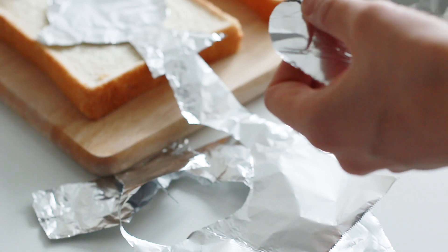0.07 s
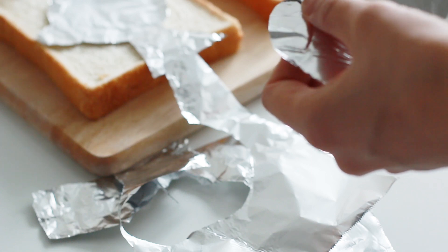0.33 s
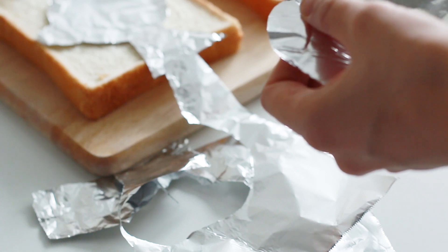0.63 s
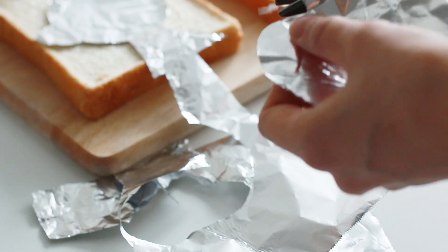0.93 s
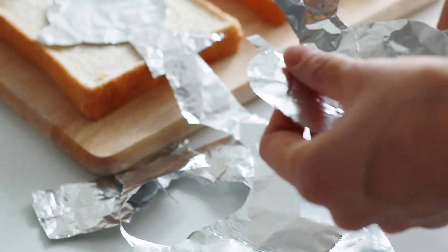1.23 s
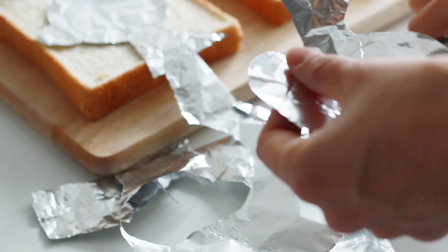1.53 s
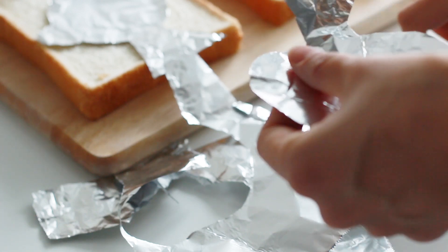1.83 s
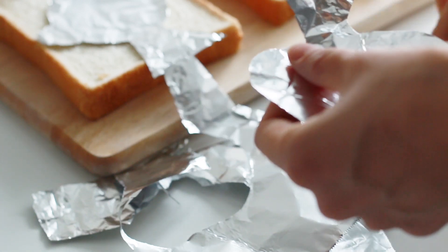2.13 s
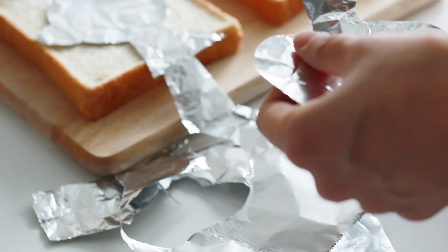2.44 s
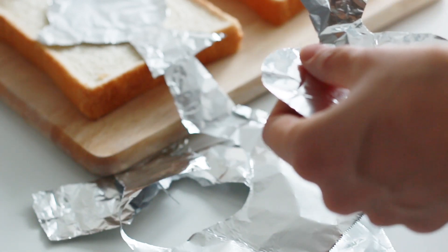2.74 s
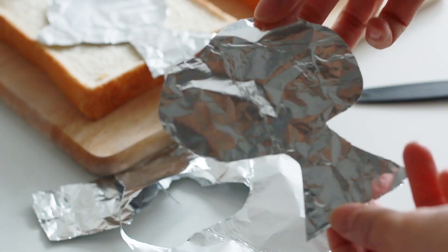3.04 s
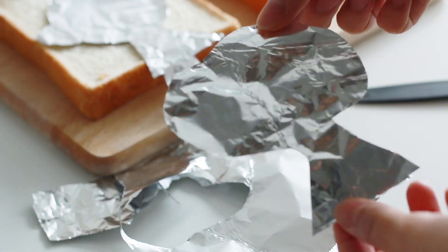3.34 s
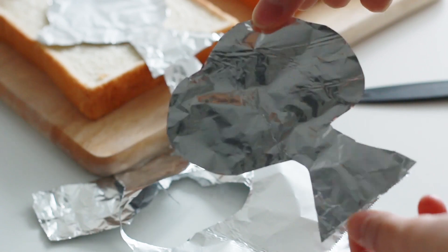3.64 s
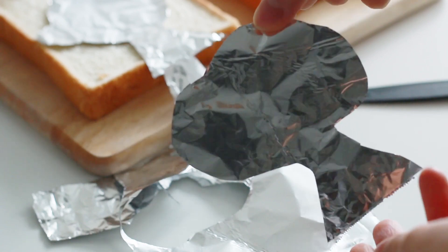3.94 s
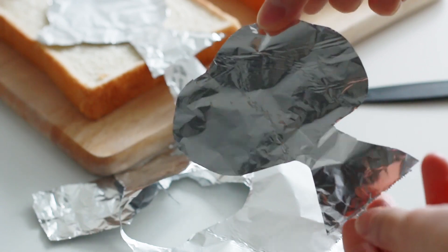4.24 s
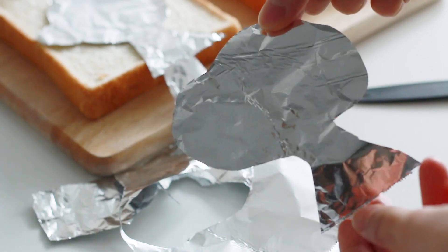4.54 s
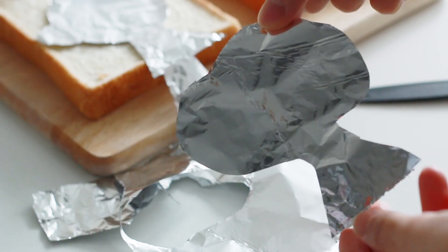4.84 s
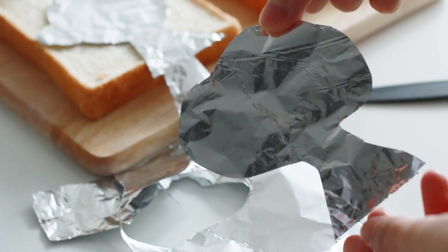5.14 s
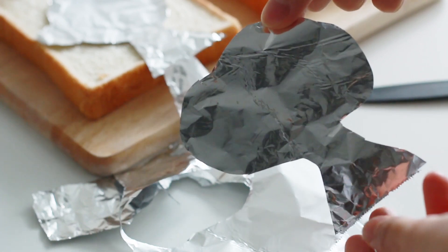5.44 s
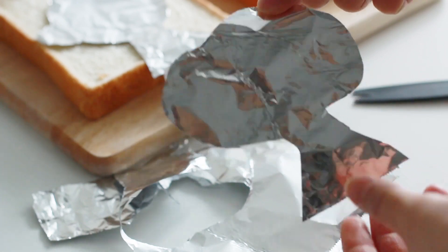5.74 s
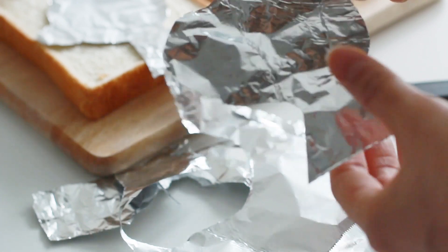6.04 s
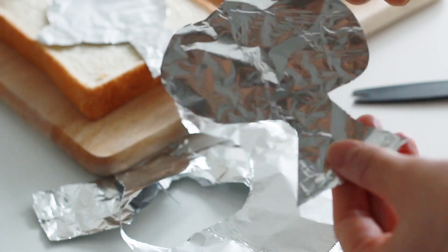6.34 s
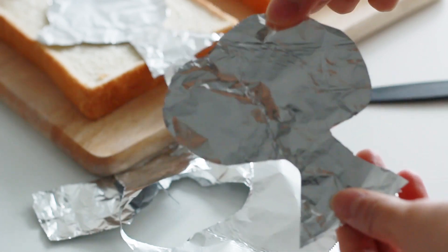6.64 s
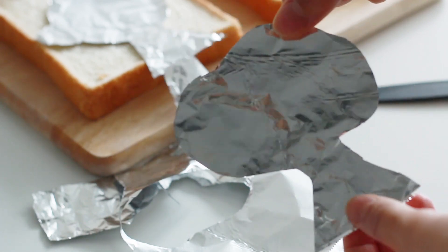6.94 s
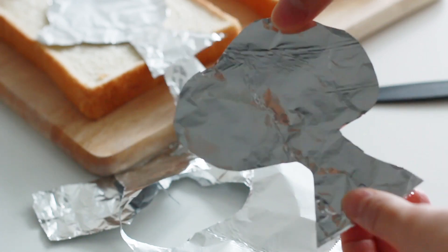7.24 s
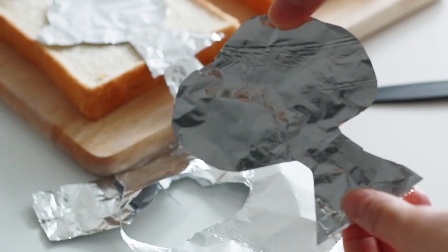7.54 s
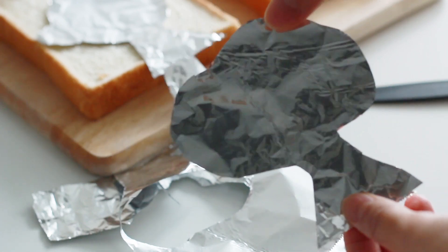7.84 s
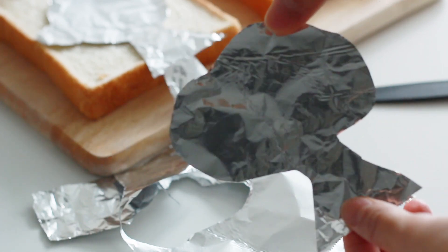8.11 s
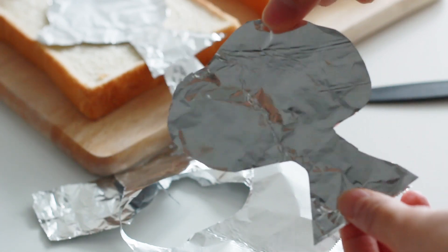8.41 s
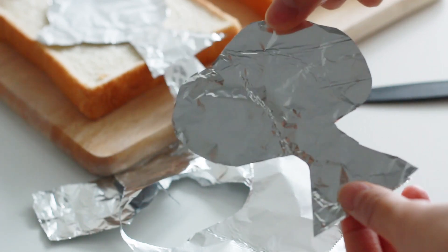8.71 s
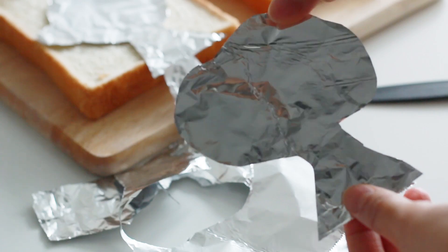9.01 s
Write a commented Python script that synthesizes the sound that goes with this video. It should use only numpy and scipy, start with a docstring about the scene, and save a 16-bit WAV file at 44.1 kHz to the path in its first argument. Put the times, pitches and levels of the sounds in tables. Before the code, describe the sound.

Hands lift and bend a piece of aluminium foil, making scattered sharp crinkles and ticks over a faint low hum.

```python
"""A cut-out of thin aluminium foil is lifted and laid on a kitchen table, near a small stereo microphone.
Single creases snap through, swarms of tiny buckles rustle as the sheet bends, and a sliding edge excites
its resonances. The room reverberates briefly. Beneath lie a faint hiss and a low rumble that step up after
three seconds, and a far bird, perhaps a crow, gives three hoarse harmonic calls."""
import sys
import numpy as np
from scipy import signal
from scipy.fft import rfft, irfft, next_fast_len
from scipy.io import wavfile
from scipy.ndimage import uniform_filter1d

SR = 44100
rng = np.random.default_rng(int(sys.argv[2]) if len(sys.argv) > 2 else 0)


def log_audio(samples):
    """Write samples as a 16-bit WAV file to the path given in sys.argv[1]."""
    # one column per channel
    frames = np.atleast_2d(samples).T
    # limit to full scale, then quantise
    limited = np.clip(frames, -1, 1)
    pcm = np.round(limited * 32767).astype(np.int16)
    wavfile.write(sys.argv[1], SR, pcm)


N = 399987

# Bends of the sheet. Each row: start in seconds, length in seconds, level in dB, body (bass lift) in dB.
BENDS = [(0, 0.027, -48.5, -7), (0.05, 0.059, -55.5, 0), (0.112, 0.025, -57, 1), (0.198, 0.03, -64.5, 9.5),
         (0.444, 0.024, -69.5, 13), (0.469, 0.025, -53.5, 1.5), (0.571, 0.022, -41, -6.5),
         (0.893, 0.06, -76.5, 3), (1.221, 0.054, -47.5, 3.5), (1.279, 0.052, -48.5, -12),
         (1.534, 0.036, -50, -10.5), (1.557, 0.049, -43.5, -11), (1.922, 0.03, -70, 7),
         (1.956, 0.057, -40.5, -15), (2.019, 0.089, -58, -16), (3.037, 0.085, -50, 7),
         (3.316, 0.083, -45.5, 4), (3.522, 0.03, -46.5, -1.5), (3.643, 0.062, -50.5, -4),
         (4.303, 0.049, -55, 2), (4.34, 0.035, -46.5, -13), (4.377, 0.061, -44.5, -3.5),
         (4.753, 0.04, -45.5, -3), (4.851, 0.032, -44, -5), (4.881, 0.05, -64.5, 5),
         (5.813, 0.022, -61, 10), (6.079, 0.033, -58, -2), (6.098, 0.08, -39, -5), (6.25, 0.067, -49, -1),
         (6.283, 0.031, -32, 2), (6.323, 0.049, -39, 4.5), (6.403, 0.25, -56.5, 9.5),
         (6.472, 0.1, -49.5, 25), (6.523, 0.055, -42, 12), (6.589, 0.27, -54, 11.5),
         (6.842, 0.091, -52.5, 25), (6.915, 0.074, -41.5, 13.5), (6.96, 0.08, -42, 8.5),
         (7.035, 0.053, -44.5, 4), (7.302, 0.032, -52.5, 17), (7.33, 0.043, -37, 5)]
# Creases that snap. Each row: time in seconds, level in dB, body in dB (more for a larger facet).
CREASES = [(0.0294, -49, -9), (0.0445, -37.5, -1), (0.066, -53.5, -13), (0.54, -66, -3), (0.5814, -40.5, 3),
           (1.0939, -45, -8.5), (1.2135, -49.5, 1), (1.2514, -35.5, -0.5), (1.2868, -40.5, -0.5),
           (1.396, -45.5, -10), (1.442, -57.5, 5), (1.675, -56.5, -12), (2.3697, -62.5, 12),
           (2.4357, -43, -1.5), (2.714, -59.5, -2), (2.837, -53.5, -15), (3.066, -41.5, -4),
           (3.099, -47.5, -8), (3.209, -57, 5), (3.2471, -56.5, 5.5), (3.4116, -31.5, -24),
           (3.517, -49, -1.5), (4.343, -42, -8), (6.096, -39.5, -26), (6.291, -34.5, -15),
           (6.3361, -33, -26), (6.374, -29.5, -2), (6.6475, -43, -21), (6.6612, -43.5, 4),
           (6.6811, -40.5, -7), (6.7277, -42.5, -0.5), (6.7706, -50, 1), (6.8515, -42, -12),
           (6.887, -35, -4), (6.922, -39, -5), (7.04, -39.5, -19), (7.0756, -42, -4), (7.3302, -38.5, 2),
           (7.364, -39, 4.5), (7.4612, -48, 10), (7.744, -41, -8), (7.7805, -31.5, -12), (7.972, -50, -2),
           (8.191, -69, 11), (8.4546, -62, 6), (8.5565, -61.5, 11), (8.583, -48, 1.5), (8.6566, -38, -4.5),
           (8.847, -60.5, 23), (8.8954, -43.5, -35), (8.9224, -35.5, -23), (8.974, -44, -8),
           (9.008, -49.5, -7), (9.047, -44.5, -24)]
# Slips of an edge. Each row: start in seconds, length in seconds, level in dB.
EDGE_SLIPS = [(3.692, 0.039, -53), (3.732, 0.053, -53.5), (4.623, 0.072, -50.5), (4.706, 0.041, -57.5),
              (5.069, 0.053, -65), (5.176, 0.14, -68.5)]
# Resonances of the sliding sheet. Each row: frequency in Hz, width in Hz, peak level in dB.
RESONANCES = [(2470, 300, -6.5), (4600, 350, -0.5), (5530, 300, -10), (8070, 410, -1), (9240, 460, -1.5),
              (10530, 420, 2), (10780, 330, 1.5), (12000, 320, 4.5), (14300, 1200, -2.5)]
# Anchors of the spectral tilt, in Hz: body, middle, pivot, top.
TILT_HZ = [1500, 4200, 9000, 13000]
# Calls of the bird. Each row: start in seconds, length in seconds, level in dB.
BIRD_CALLS = [(3.05, 0.19, -73.5), (3.7, 0.25, -65.5), (4.56, 0.268, -65.5)]

# Spectral shapes. Each row: frequency in Hz, relative spectral density in dB.
FOIL_SPECTRUM = [(200, -30), (450, -12), (750, -19), (1000, -6.5), (1700, -10), (2300, -12), (3050, -7.5),
                 (3500, -11), (4500, -3), (6300, -9.5), (8900, 0.5), (11200, -2.5), (12800, -6.5),
                 (15800, -13)]
HELD_COLOUR = [(380, -18), (600, 7.5), (900, 2), (1400, 0.5), (2300, 2), (3100, 2.5), (4500, 2), (9000, 1),
               (13000, -2)]  # added before STEP_S, while the foil is held low against the board
QUIET_SPECTRUM = [(15, 41), (35, 39.5), (70, 34.5), (115, 28), (200, 22), (290, 15), (600, 12), (1500, 3),
                  (4000, 1), (13000, 2), (16000, -10.5)]
BOOM_SPECTRUM = [(15, -19.5), (32, -7), (53, -15), (62, -1.5), (69, 2), (78, -2), (95, -7.5), (115, -22.5),
                 (160, -36), (300, -65.5)]
RUMBLE_SPECTRUM = [(70, -15.5), (105, -2), (125, 2), (165, 1), (195, -10), (240, -20.5), (290, -27.5),
                   (335, -23), (450, -31.5), (750, -35.5), (1500, -47.5), (4000, -70.5)]
HISS_SPECTRUM = [(300, 12), (1000, 6), (3000, 0), (8000, -5), (12000, -5.5), (16000, 0), (17000, -24)]
# Envelopes of the low noise. Each row: time in seconds, gain in dB.
EARLY_ENVELOPE = [(0, -89.5), (1.3, -75), (1.8, -66), (2.17, -56), (2.5, -63), (3, -63.5)]  # the boom before the step
LATE_ENVELOPE = [(3.06, -41), (3.11, -46), (3.29, -42), (3.41, -47), (4.92, -42), (5.54, -47.5),
                 (6.82, -41.5), (7.18, -47.5), (8.26, -44), (9.07, -49.5)]  # boom and rumble after it

# Reverberation of the kitchen. Each row: frequency in Hz, time to decay by 60 dB in seconds.
ROOM_T60 = [(500, 0.33), (1500, 0.34), (4000, 0.28), (9000, 0.22), (15000, 0.26)]
# Likeness of the two microphone ports. Each row: frequency in Hz, coherence (negative counts as 0).
PORT_COHERENCE = [(30, -0.2), (90, 0.94), (300, 0.35), (900, 0.43), (2600, 0.82), (7000, 0.69),
                  (11000, 0.7), (15500, 0.6)]
# Phase between the ports. Each row: frequency in Hz, lead of the left in radians.
PORT_LEAD = [(1000, .05), (4500, .1), (8200, .35), (10300, -.15), (12000, .7), (13500, 2.1), (15500, 2.2)]
# Balance of the ports. Each row: frequency in Hz, level of left over right in dB.
PORT_BALANCE = [(200, 1.5), (1500, 0.5), (3000, 0), (5500, 1), (9300, 1.5), (10300, -1.5), (11600, -3),
                (13200, -1), (15000, -2)]

STEP_S = 3.049  # the background steps up
LEAD_IN_S, TRAIL_S = 0.018, 0.035  # faint ticks lead into and trail each sharp snap
BUCKLING_S, HARD_DB, DOUBLING_DB = 0.0014, -32, 22  # buckling time at HARD_DB; the drop that doubles it
RISE_SHARE = 0.25  # share of a push spent swelling
CAW_HZ, CAW_ARCH = 185.1, 0.0393  # fundamental, and the share by which it arches
LOWEST_HARMONIC, CAW_HARMONICS_DB = 5, [-34, 0, -6.5, -11]  # harmonics that the throat lets through


def gain_of(db):
    """Decibels as an amplitude ratio."""
    return 10 ** (np.asarray(db) / 20)


def unit_rms(x):
    """Normalises each channel to unit mean power."""
    return x / np.sqrt(np.mean(x ** 2, -1, keepdims=True) + 1e-30)


def at_hz(points, hz):
    """Interpolates a curve on a logarithmic frequency axis."""
    f, value = np.transpose(points)
    return np.interp(np.log(hz + 1), np.log(f + 1), value)


def envelope(points):
    """Interpolates decibels over time into a gain for every sample."""
    return gain_of(np.interp(np.arange(N) / SR, *np.transpose(points)))


def add(mix, s, sound):
    """Superposes a stereo sound on the mix at s seconds."""
    part = mix[:, max(round(s * SR), 0):][:, :sound.shape[1]]
    part += sound[:, :part.shape[1]]


def placed(sound, seconds, db, pan_db):
    """Energy is power times duration: scales a sound to level db held for so many seconds, and pans it."""
    sides = unit_rms(gain_of([pan_db / 2, -pan_db / 2]))[:, None]
    return unit_rms(sound) * np.sqrt(seconds * SR / sound.shape[1]) * gain_of(db) * sides


def minimum_phase(db):
    """Causality: a frequency response with this gain that rings only after its excitation."""
    cepstrum = irfft(np.log(gain_of(db)))
    half = len(cepstrum) // 2
    return np.exp(rfft(cepstrum * np.r_[1, np.full(half - 1, 2), 1, np.zeros(half - 1)]))


def ports(pair, colour):
    """Partial coherence: two independent signals, filtered by colour(hz) in dB, blend at close ports."""
    spectra, hz = rfft(pair), np.fft.rfftfreq(pair.shape[1], 1 / SR)
    coherence = np.clip(at_hz(PORT_COHERENCE, hz), 0, 1)
    lean = gain_of(at_hz(PORT_BALANCE, hz) / 2)
    right = coherence * spectra[0] + np.sqrt(1 - coherence ** 2) * spectra[1]
    right *= np.exp(-1j * at_hz(PORT_LEAD, hz))
    stereo = irfft(np.array([spectra[0] * lean, right / lean]) * minimum_phase(colour(hz)))
    return stereo[:, :-256]  # the end holds the filters' wrap-around


def tilt(hz, body_db, middle_db, top_db):
    """Spectral tilt about a fixed pivot, in dB."""
    return at_hz(list(zip(TILT_HZ, (body_db, middle_db, 0, top_db))), hz)


def facet_colour(s, body_db, middle_db, top_db, middle_share=0.26):
    """A larger radiator gives more low and middle frequencies: a facet's spectrum in dB at time s."""
    middle_db += middle_share * body_db
    return lambda hz: (at_hz(FOIL_SPECTRUM, hz) + tilt(hz, body_db, middle_db, top_db)
                       + (s < STEP_S) * at_hz(HELD_COLOUR, hz))


def swarm(rise, fall, per_s, spread_db, edge_db):
    """Shot noise under an envelope that swells and fades: its clicks and its equal-energy duration."""
    t = np.arange(0, rise + fall, 1 / SR)
    swell = gain_of(np.interp(t, [0, rise, t[-1]], [edge_db, 0, edge_db])) * np.minimum(2 * t / rise, 1)
    sizes = gain_of(spread_db * np.minimum(rng.exponential(1, len(t)), 3.5))
    signs = rng.choice([-1, 1], len(t))
    occurs = rng.random(len(t)) < per_s / SR
    return swell * sizes * signs * occurs, np.sum(swell ** 2) / SR


def sheet(clicks, colour, ring_t60, ring_db, crack_t60, facet_db=5, size=4096):
    """Impulsive excitation: each click cracks at once and stores energy in dense, decaying modes."""
    t = np.arange(size) / SR
    burst = rng.standard_normal((2, size)) * gain_of(-60 * t / crack_t60)
    crack = signal.fftconvolve(clicks[None], burst, axes=1)
    energy = abs(signal.fftconvolve(clicks ** 2, gain_of(-60 * t / ring_t60) ** 2))
    ring = np.sqrt(energy) * rng.standard_normal(crack.shape)
    pair = unit_rms(crack) + gain_of(ring_db) * unit_rms(ring)
    pair = np.pad(pair, ((0, 0), (0, -pair.shape[1] % size)))
    # every bend leaves facets of other sizes, so each sound rings at its own pitches
    pitches = np.arange(0, SR / 2, 190)
    ripple_db = facet_db * np.clip(rng.standard_normal(len(pitches)), -2, 2)
    return ports(pair, lambda hz: colour(hz) + np.interp(hz, pitches, ripple_db))


def rustles(per_s=2600, trim_db=-1.5):
    """Crackling noise: a bending sheet releases elastic energy in swarms of tiny buckles."""
    out = np.zeros((2, N))
    for s, length, db, body_db in BENDS:
        rise, fall = RISE_SHARE * length, (1 - RISE_SHARE) * length
        clicks, seconds = swarm(rise, fall, per_s, spread_db=4, edge_db=-10)
        colour = facet_colour(s, body_db, middle_db=1.5, top_db=1.5)
        sound = sheet(clicks, colour, ring_t60=0.073, ring_db=-3, crack_t60=0.005)
        add(out, s, placed(sound, seconds, db + trim_db, pan_db=-1.5))
    return out


def reverberation(source, onset_s=0.0048, size=16384):
    """The kitchen's diffuse field builds quickly and decays exponentially, sooner in the treble."""
    hz, t, bands = signal.stft(rng.standard_normal((2, size)), SR, nperseg=256)
    decay = gain_of(-60 * t / at_hz(ROOM_T60, hz)[:, None])
    tail = signal.istft(bands * decay, SR)[1][:, :size]
    tail *= np.minimum(np.arange(size) / SR / onset_s, 1) ** 2
    tail = ports(tail, lambda hz: at_hz([(500, 1), (4000, 1), (9000, -1.5), (15000, -1.4)], hz))
    return signal.fftconvolve(source[:1], unit_rms(tail) / np.sqrt(size), axes=1)[:, :N]


def steady_noise(spectrum):
    """Filtered white noise: a stationary sound of the given spectrum, at rms 1."""
    white = rng.standard_normal((2, 2 * next_fast_len((N + SR) // 2)))
    return unit_rms(ports(white, lambda hz: at_hz(spectrum, hz))[:, :N])


def background(quiet_db=-71.5, hiss_db=-80.5, crossfade_s=0.002):
    """Incoherent noises add in power: a quiet room and a faint boom, then a step in boom, rumble, hiss."""
    boom = steady_noise(BOOM_SPECTRUM)
    early = boom * envelope(EARLY_ENVELOPE)
    low = boom * gain_of(0.5) + steady_noise(RUMBLE_SPECTRUM) * gain_of(-7.5)
    late = low * envelope(LATE_ENVELOPE) + steady_noise(HISS_SPECTRUM) * gain_of(hiss_db)
    step = np.clip((np.arange(N) / SR - STEP_S) / crossfade_s, 0, 1)
    return steady_noise(QUIET_SPECTRUM) * gain_of(quiet_db) + (1 - step) * early + step * late


def snaps(buckles=8, tick_db=-28, trim_db=-0.4):
    """Snap-through buckling: a crease gives way in a quick run of buckles, sooner in a harder snap."""
    out, first = np.zeros((2, N)), int(LEAD_IN_S * SR)
    for s, db, body_db in CREASES:
        ticks, _ = swarm(LEAD_IN_S, TRAIL_S, per_s=1000, spread_db=4, edge_db=-9.5)
        clicks = gain_of(tick_db) * ticks
        run_s = min(BUCKLING_S * 2 ** ((HARD_DB - db) / DOUBLING_DB), TRAIL_S / 2)
        later = first + 1 + (rng.random(buckles) * run_s * SR).astype(int)
        clicks[first] = 1  # the strongest buckle leads a run of weaker ones
        clicks[later] = 0.46 * rng.uniform(0.31, 1, buckles) * rng.choice([-1, 1], buckles)
        colour = facet_colour(s, body_db, middle_db=0.5, top_db=3)
        sound = sheet(clicks, colour, ring_t60=0.047, ring_db=1, crack_t60=0.002)
        add(out, s - LEAD_IN_S, placed(sound, seconds=0.0069, db=db + trim_db, pan_db=-3))
    return out


def bird(roughness=0.0345, echo_t60=0.94, echo_db=2):
    """Pitch jitter makes an arching harmonic call hoarse; multipath echoes blur it on its long way."""
    out = np.zeros((2, N))
    decay = gain_of(-60 * np.arange(SR) / SR / echo_t60)
    for s, length, db in BIRD_CALLS:
        arch = np.sin(np.pi * np.arange(0, length, 1 / SR) / length)
        jitter = unit_rms(uniform_filter1d(rng.standard_normal(len(arch)), 256))
        cycles = np.cumsum(CAW_HZ * (1 + CAW_ARCH * arch + roughness * jitter)) / SR
        call = arch * sum(gain_of(harmonic_db) * np.sin(2 * np.pi * k * cycles)
                          for k, harmonic_db in enumerate(CAW_HARMONICS_DB, LOWEST_HARMONIC))
        echoes = unit_rms(ports(rng.standard_normal((2, SR)) * decay, np.zeros_like))
        path = gain_of(echo_db) * echoes / np.sqrt(SR)
        path[:, 0] += 1  # the direct sound
        add(out, s, placed(signal.fftconvolve(call[None], path, axes=1), length, db, pan_db=0))
    return out


def slide_colour(hz):
    """Modal summation: the tilted power spectrum of the sliding sheet's resonances, in dB."""
    power = sum(gain_of(db) ** 2 / (1 + ((hz - f) / width) ** 2) ** 2 for f, width, db in RESONANCES)
    return 10 * np.log10(power + 1e-6) + tilt(hz, body_db=-0.5, middle_db=-0.5, top_db=-4.5)


def slides(per_s=5000):
    """Frictional excitation: fine, even slips of an edge keep a few resonances of the sheet ringing."""
    out = np.zeros((2, N))
    for s, length, db in EDGE_SLIPS:
        rise, fall = RISE_SHARE * length, (1 - RISE_SHARE) * length
        clicks, seconds = swarm(rise, fall, per_s, spread_db=2, edge_db=-8)
        sound = sheet(clicks, slide_colour, ring_t60=0.039, ring_db=2, crack_t60=0.005)
        add(out, s, placed(sound, seconds, db, pan_db=-2))
    return out


def scene():
    """Superposition of the foil, its reverberation, the far bird and the background."""
    foil = snaps() + rustles() + slides()
    return foil + gain_of(-7.5) * reverberation(foil) + bird() + background()


def record(dry):
    """Band limiting: a linear-phase low-pass filter cuts off at 16.2 kHz."""
    lowpass = signal.firwin(401, 16200, window=("kaiser", 9), fs=SR)
    return signal.oaconvolve(dry, lowpass[None], "same")


dry = scene()
out = record(dry)
log_audio(out)
```